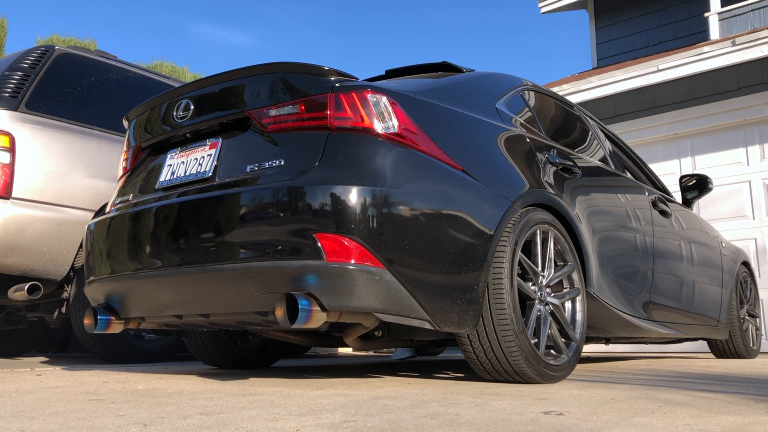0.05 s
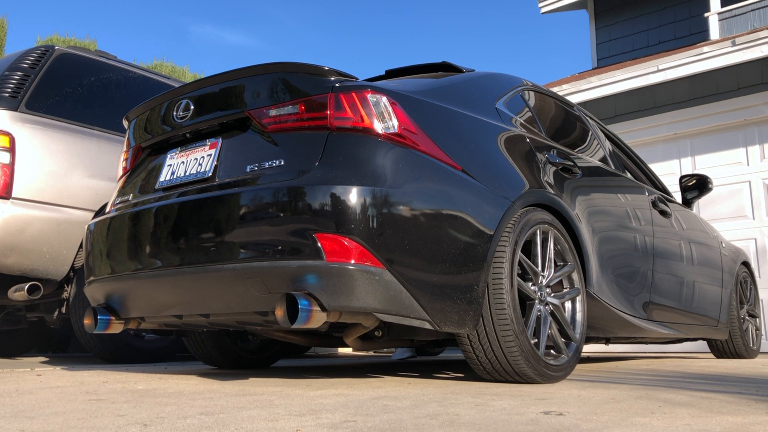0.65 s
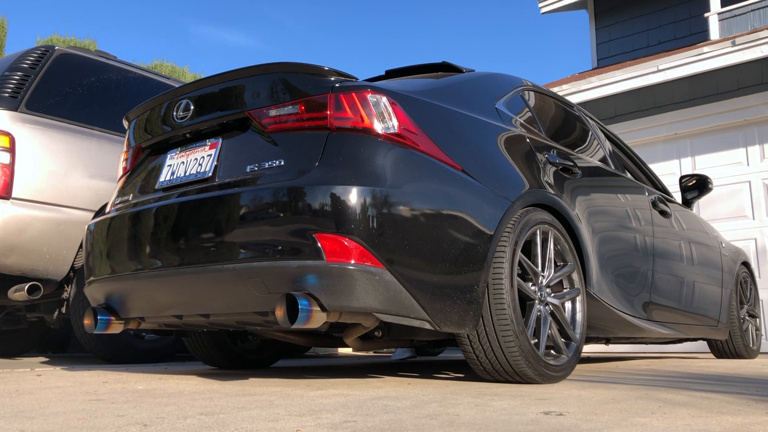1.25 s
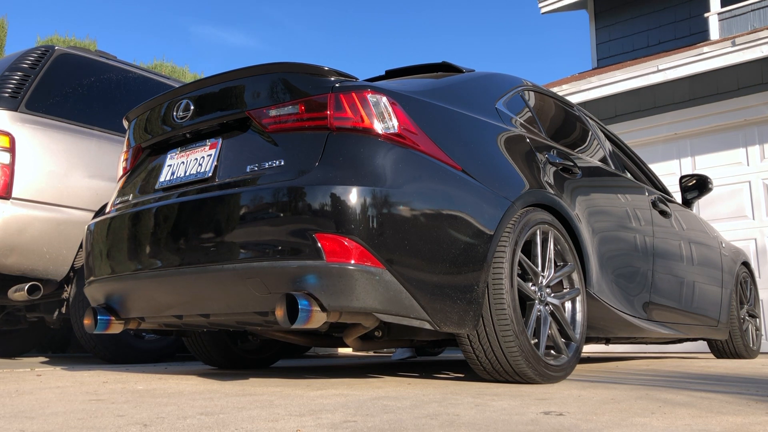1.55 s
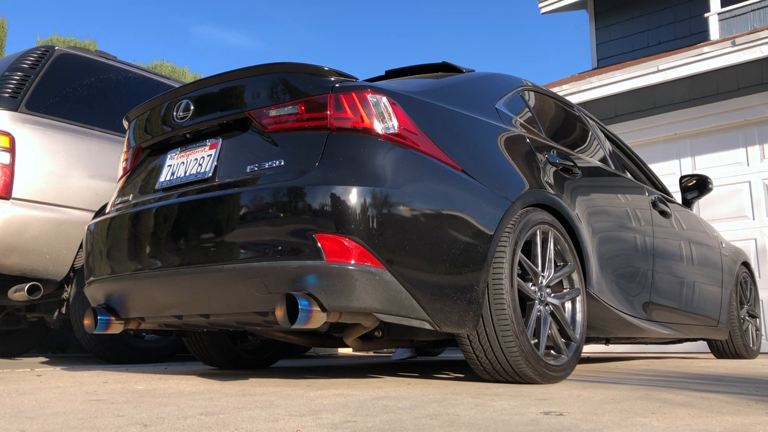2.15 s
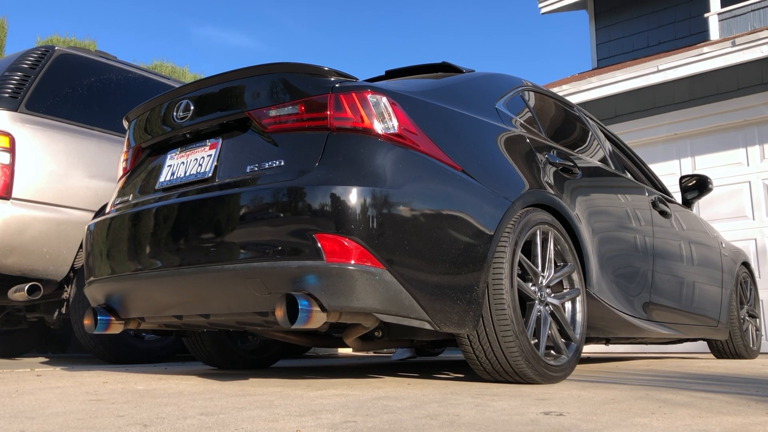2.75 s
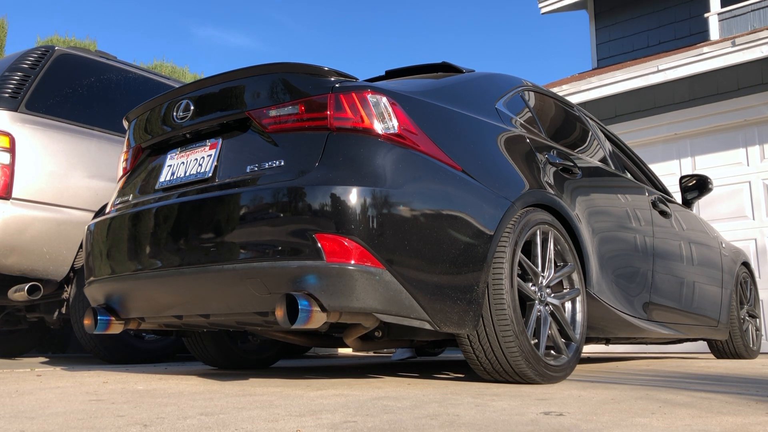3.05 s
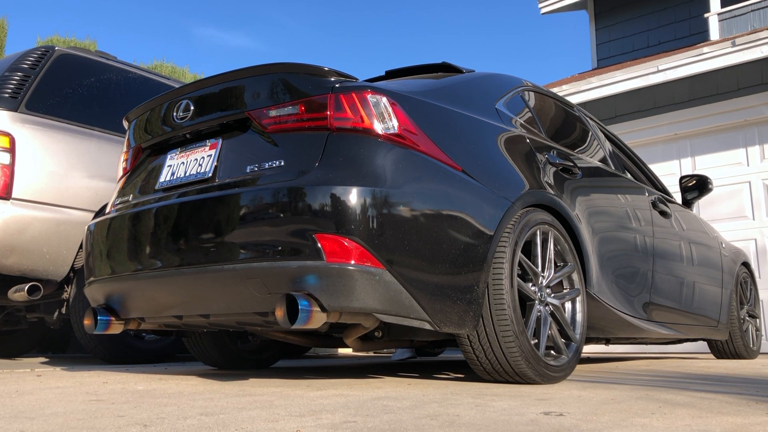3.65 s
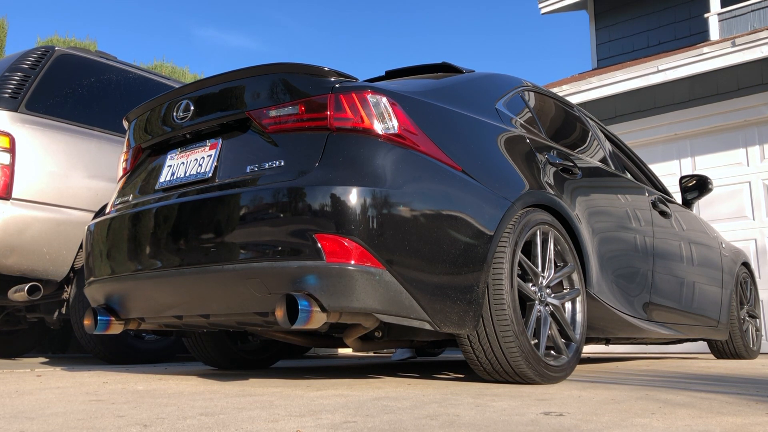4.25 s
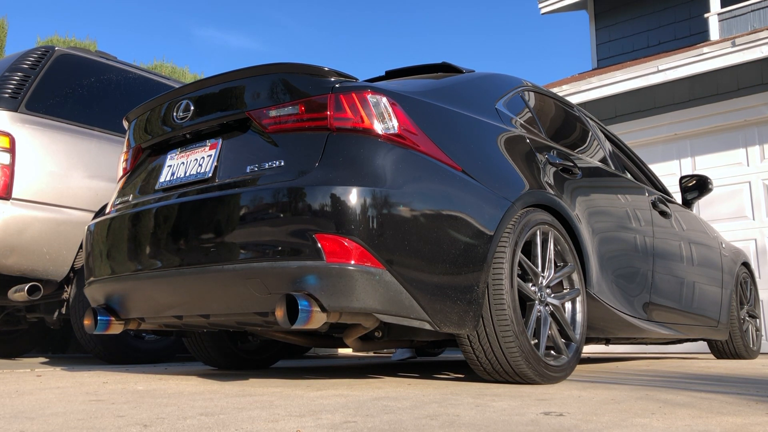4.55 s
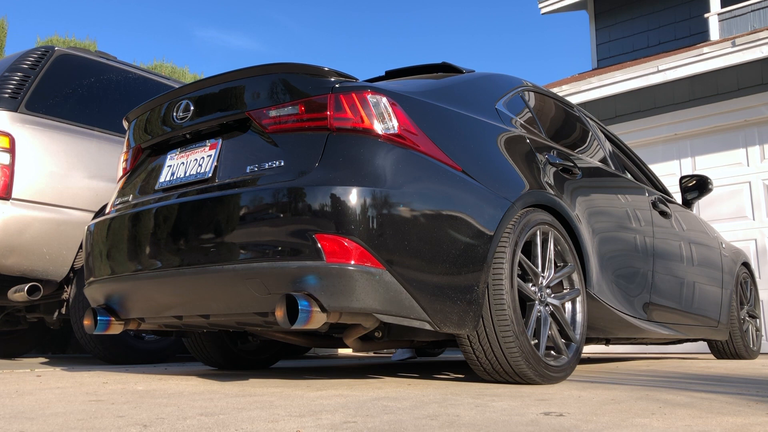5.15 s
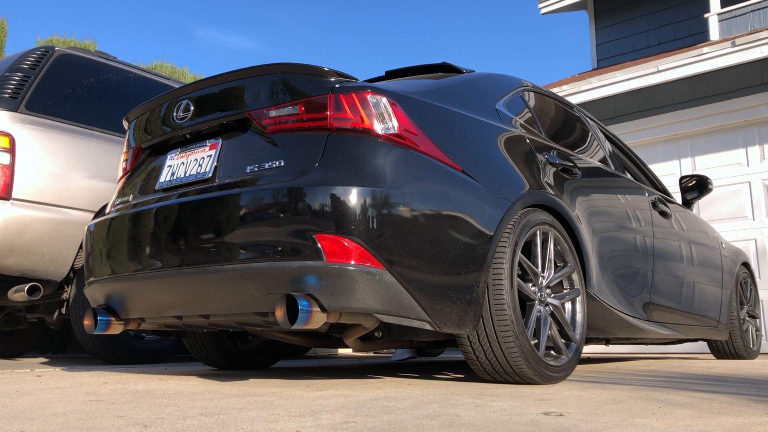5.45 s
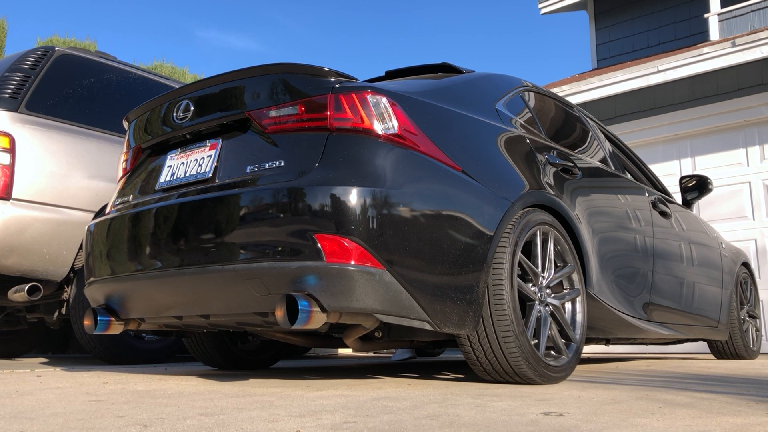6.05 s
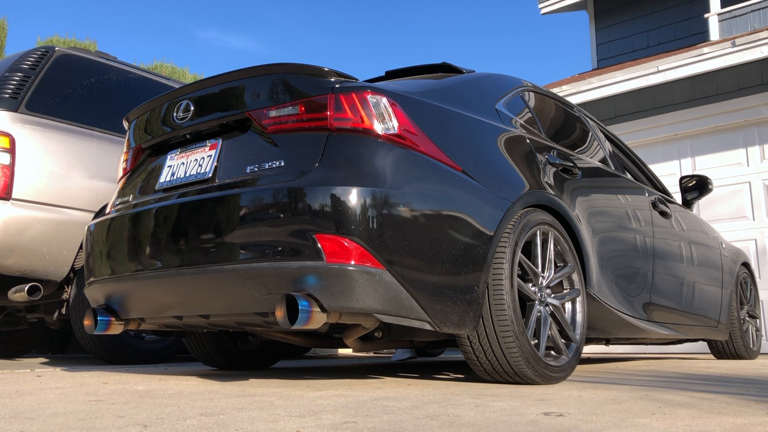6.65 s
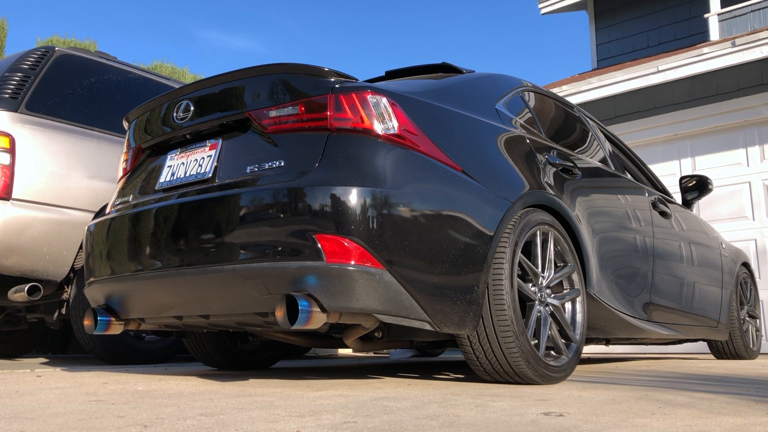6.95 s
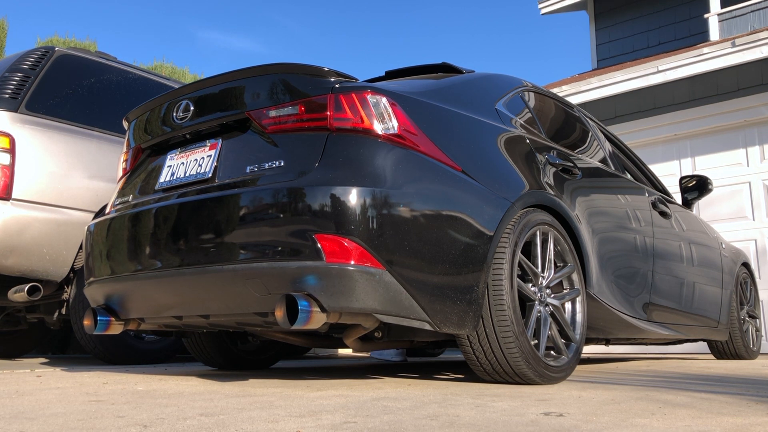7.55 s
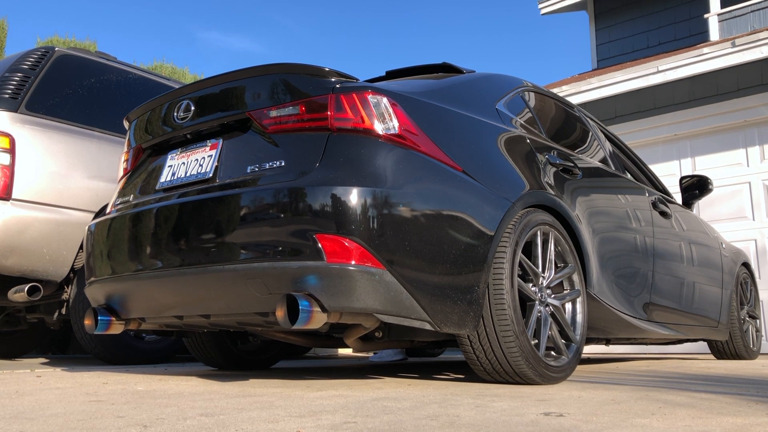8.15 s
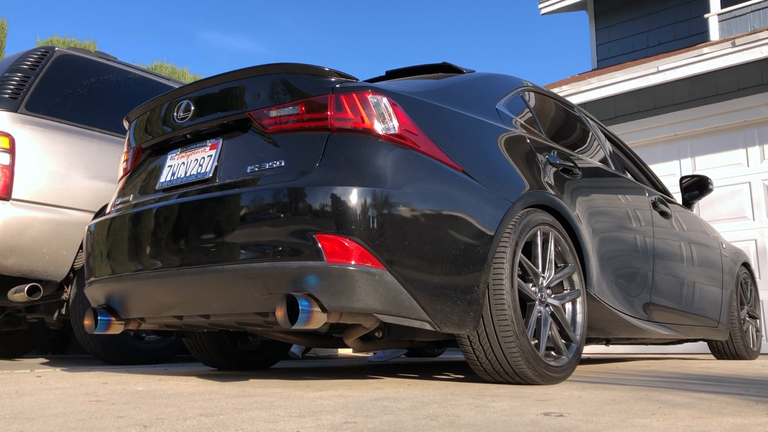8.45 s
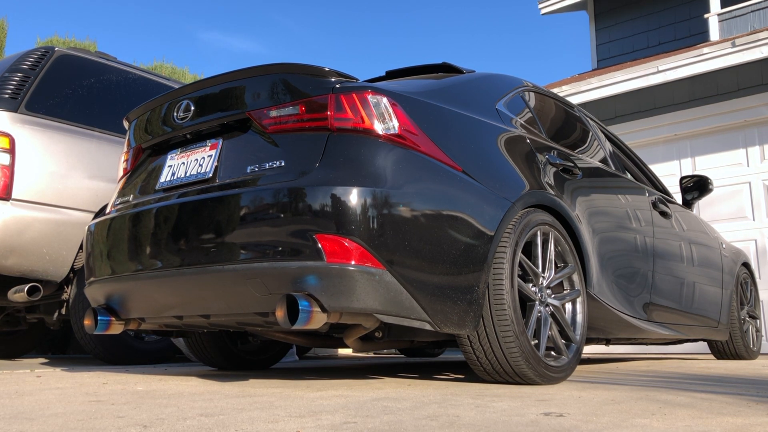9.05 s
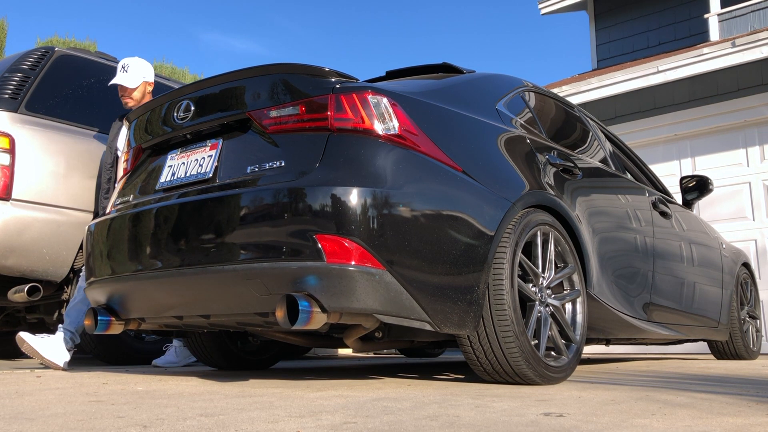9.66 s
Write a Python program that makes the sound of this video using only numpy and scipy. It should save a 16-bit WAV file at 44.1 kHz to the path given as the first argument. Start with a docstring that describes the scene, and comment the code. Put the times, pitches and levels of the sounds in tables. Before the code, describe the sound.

A six-cylinder car engine idles throughout in a driveway, heard from low and close behind its free-flowing exhaust. For the first second and a half it runs at a fast idle with a hard, uneven, cold rasp. Around 2 seconds the rasp gives way to a softer, slightly buzzy beat. Between about 4 and 7 seconds the revs sink a little and the buzz fades, leaving a deep, even drone that holds to the end. A faint, wavering timing chain whine and a light hiss from the engine bay and tailpipes sit above it, with a low rumble underneath. From about 8.5 seconds a soft rush rises. One tiny, sharp, bright click comes at 9.3 seconds, and at about 9.6 a shoe scuffs briefly on gritty concrete as the low rumble swells under the continuing idle.

```python
"""A V6 idles through a free-flowing exhaust in a driveway, heard from low behind the car.
Uneven cylinder pulses ring the pipes with a hard, cold rasp; around two seconds in, the cams swing back
and the beat softens, then the revs sink to a deep, even drone. The timing chain whines faintly over the
hiss of engine bay and tailpipes, with a low rumble underneath. Near the end a soft rush rises, there is
one sharp click, and a shoe scuffs the concrete as the rumble swells."""
import sys
import numpy as np
from scipy import signal
from scipy.fft import rfft, irfft, next_fast_len
from scipy.io import wavfile
from scipy.ndimage import uniform_filter1d

SR = 44100
rng = np.random.default_rng(int(sys.argv[2]) if len(sys.argv) > 2 else 0)


def generate_wav(sig):
    """Save sig (samples, or channels by samples) to the path in sys.argv[1] as 16-bit PCM at SR."""
    pcm = np.round(np.clip(np.atleast_2d(sig).T, -1, 1) * 32767).astype(np.int16)
    wavfile.write(sys.argv[1], SR, pcm)


N = 432621
TIME = np.arange(N) / SR
IDLE_HZ, FAST_IDLE_HZ = 64, 71  # firing rates

# The revs. Each row: time in seconds, firings per second.
REVS = [(0.0, 71.14), (0.7, 71.98), (1.0, 71.47), (1.4, 71.66), (1.65, 70.7), (1.85, 71.14), (2.5, 69.58),
        (2.9, 69.91), (3.3, 71.14), (4.1, 69.82), (4.5, 69.5), (5.3, 68.15), (6.5, 64.5), (6.9, 63.85),
        (7.7, 64.11), (8.5, 63.5), (8.9, 63.99), (9.81, 63.58)]

def engine_state():
    """The firing rate in Hz, then three 0-1 faders: hard cam timing, cold load and shut throttle."""
    speed = np.interp(TIME, *np.transpose(REVS))
    hard = 1 - ramp(1.525, 1.736)  # the cams swing back, ending the rasp
    load = 1 - ramp(1.73, 2.27)
    shut = ramp(1.27, 2.1) - ramp(2.35, 3.14)
    return speed, hard, load, shut


# The drone under cold load. Each row: multiple of the firing rate, level in dB.
COLD_DRONE = [(1, -28), (2, -19.9), (3, -22), (4, -30.3), (5, -24.5), (6, -22.5)]
# Standing waves of the warm pipes. Each row: centre in Hz, width in Hz, peak level in dB.
STANDING_WAVES = [(62.3, 4.3, -33.5), (69.7, 3, -41.5), (131.3, 34.7, -18.5), (194.1, 16, -27),
                  (214.9, 13.2, -22.5), (248.8, 42.4, -34), (290, 16, -31.5), (322.5, 31.8, -31),
                  (340.3, 18, -29.5), (403, 31.9, -40.5), (425.2, 11.3, -30)]

def exhaust_drone(firing, waver_db=0.15, waver_hz=25, sag_db=-3, shut_db=-2):
    """The body: six firing harmonics, all strong when cold; once warm, each swells on a standing wave."""
    speed, _, load, shut = engine_state()
    centre, width, peak_db = np.transpose(STANDING_WAVES)[:, :, None]
    hz = np.arange(50, 450, .25)
    pipes_db = 10 * np.log10(np.sum((gain_of(peak_db) * resonance(hz, centre, width)) ** 2, 0))
    early = 1 - ramp(1.55, 1.76)
    sag = np.sin(np.pi * early)  # a brief dip as the cams swing back
    out = np.zeros(N)
    for k, (_, cold_db) in enumerate(COLD_DRONE, 1):
        upper = k > 2
        warm_db = np.interp(k * speed, hz, pipes_db) + shut_db * shut * upper
        db = load * cold_db + (1 - load) * warm_db + sag_db * sag * upper
        lead = early * upper * (k + 6) / 11 - (k != 2) / 3  # in cycles; warm, the second harmonic leads
        out += gain_of(db + waver_db * wander(TIME * waver_hz)) * np.cos(2 * np.pi * (k * firing + lead))
    return np.sqrt(2) * out


# The tone of each gas puff. Each row: frequency in Hz, relative level in dB.
PUFF_EQ = [(100, -10), (300, -7), (550, -2), (1200, 3), (2000, 5), (5000, 5)]

def blowdowns(firing, cylinder_db, lag, modes, pulse_db, puff_db, puff_firings, leak, uneven_db):
    """Six unequal cylinders vent in turn, each a pressure pulse and a turbulent puff that ring the pipes."""
    size, cylinders = 4096, 6
    order = np.arange(size // 16)
    cycle = np.arange(size) * cylinders / size  # one engine cycle, in firings
    strength = unit_rms(gain_of(cylinder_db))
    opens = np.arange(cylinders) + lag
    harmonics = strength @ np.exp(-2j * np.pi * np.outer(opens, order) / cylinders)
    harmonics[(order % cylinders == 0) & (order <= cylinders ** 2)] = 0  # leave room for the drone
    pulses = unit_rms(np.interp(firing, cycle, irfft(harmonics, size), period=cylinders))
    # stronger cylinders blow much more turbulence
    flow = strength ** 2 @ np.exp(-((cycle - opens[:, None]) % cylinders) / puff_firings)
    puffs = unit_rms((leak + np.interp(firing, cycle, flow, period=cylinders)) * noise(PUFF_EQ))
    blows = (gain_of(pulse_db) * pulses + gain_of(puff_db) * puffs) * gain_of(uneven_db * wander(firing))
    centre, width, mode_db = modes
    hz = abs(np.fft.fftfreq(size, 1 / SR))
    pipe_power = gain_of(mode_db) ** 2 @ resonance(hz, centre[:, None], width[:, None]) ** 2
    return signal.oaconvolve(blows, minimum_phase(np.sqrt(pipe_power)))[:N]


# The cylinders in firing order. Each row: cold relative level in dB, cold valve lag in firings,
# warm relative level in dB, warm valve lag in firings.
CYLINDERS = [(.5, .72, -2.2, .2), (-2, .76, .4, .12), (2, .72, .4, .21), (-1.7, .71, -3.2, .21),
             (2.4, .73, 1.8, .23), (-3.4, .74, -.7, .22)]
# The ring of pipes and silencers. Each row: centre in Hz, width in Hz, cold gain in dB, warm gain in dB.
PIPE_MODES = [(126.7, 38.5, -34, -34), (152, 23, -58, -38), (222.8, 14.5, -30.5, -33.5),
              (333, 35.4, -34, -40.5), (422.4, 123, -35.5, -46), (492.9, 47.3, -50.5, -44),
              (639.3, 10, -54.5, -50), (727, 86, -43, -63.5), (801, 93, -42.5, -58), (947, 100, -51.5, -73),
              (1173, 130, -52, -74.5), (1265, 98, -50, -69.5), (1480, 76, -63.5, -72),
              (1588, 120, -57, -78.5), (1967, 340, -71, -85.5)]

def exhaust_beat(firing, idle_db=-1.5, hard_db=-1.25, load_db=3.5, db_per_hz=0.18, pull_db=0.43):
    """The cold rasp crossfades to a soft warm beat as the cams swing; it hits harder as the engine pulls."""
    speed, hard, load, _ = engine_state()
    cold_db, cold_lag, warm_db, warm_lag = np.transpose(CYLINDERS)
    centre, width, cold_ring_db, warm_ring_db = np.transpose(PIPE_MODES)
    valves = firing + .24  # the valves run slightly ahead
    cold = blowdowns(valves, cold_db, cold_lag, (centre, width, cold_ring_db),
                     pulse_db=23.5, puff_db=33, puff_firings=0.28, leak=0.063, uneven_db=1.4)
    warm = blowdowns(valves, warm_db, warm_lag, (centre, width, warm_ring_db),
                     pulse_db=25, puff_db=35, puff_firings=0.22, leak=0.37, uneven_db=0.1)
    pull = uniform_filter1d(np.gradient(speed) * SR, round(0.91 * SR))  # smoothed, in Hz per second
    cold_share = np.interp(hard, [0, 1], [.07, .87])
    db = idle_db + hard_db * hard + load_db * load + db_per_hz * (speed - IDLE_HZ) + pull_db * pull
    return gain_of(db) * (cold_share * cold + (1 - cold_share) * warm)


# The buzz on top of the beat. Each row: multiple of the firing rate, level in dB at a soft fast idle.
BUZZ_PARTIALS = [(7, -35), (9, -50.5), (10.5, -47), (11, -50), (12, -52), (14, -60.5), (18, -60)]

def pipe_buzz(firing, db_per_hz=1.85, hard_db=-9, shimmer_db=1.0, shimmer_hz=12):
    """At light load the firings are alike, so clean overtones stand out; they fade as the revs sink."""
    speed, hard, _, _ = engine_state()
    partials = sum(gain_of(db + shimmer_db * wander(TIME * shimmer_hz)) * np.cos(2 * np.pi * k * firing)
                   for k, db in BUZZ_PARTIALS)
    return np.sqrt(2) * gain_of(db_per_hz * (speed - FAST_IDLE_HZ) + hard_db * hard) * partials


# The tone of the engine bay. Each row: frequency in Hz, relative level in dB.
BAY_EQ = [(30, -8.5), (90, 6), (300, 27.5), (950, 3.5), (1500, 7.5), (2100, -3), (2800, -2.5), (4000, -5),
          (5200, -7), (7000, -15), (10000, -25.5), (16000, -36.5)]

def bay_hiss(firing, idle_db=-55, db_per_hz=0.2834, load_db=-2.5, shut_db=-5.5, flutter_db=0.54):
    """Belts and intake hiss under the car, riding the air flow and fluttering with the firings."""
    speed, _, load, shut = engine_state()
    db = idle_db + db_per_hz * (speed - IDLE_HZ) + load_db * load + shut_db * shut
    return gain_of(db + flutter_db * wander(2 * firing)) * underbody(noise(BAY_EQ, (2500, 7000)))


def underbody(x, echo_db=-17, shortest_s=.0011, longest_s=.014, count=10):
    """Short echoes between floor pan and concrete comb the sound."""
    delays = rng.uniform(shortest_s, longest_s, count)
    echoes = sum((-1) ** k * np.roll(x, round(s * SR)) for k, s in enumerate(delays))
    echo_gain = gain_of(echo_db)
    return (x + echo_gain * echoes) / np.sqrt(1 + count * echo_gain ** 2)


# The airy top of the escaping gas. Each row: frequency in Hz, relative level in dB.
GAS_EQ = [(2000, -25.5), (5000, -4.5), (8000, 1), (11000, 1.5), (13500, 2.5), (15600, 4)]

def tailpipe_hiss(firing, idle_db=-68, db_per_hz=0.38, load_db=2, shut_db=-3, flutter_db=0.7):
    """Gas leaves the tips in a bright, fluttering hiss that follows the flow."""
    speed, _, load, shut = engine_state()
    db = idle_db + db_per_hz * (speed - IDLE_HZ) + load_db * load + shut_db * shut
    return gain_of(db + flutter_db * wander(2 * firing)) * noise(GAS_EQ, (9000, 15000))


# The chain's whine. Each row: multiple of the tooth rate, base level in dB.
CHAIN_PARTIALS = [(5, -70.5), (6, -72), (7, -73.5), (8, -72), (9, -70.5), (10, -76.5), (12, -75),
                  (13, -77.5), (14, -78)]
# The ring of the chain cover. Each row: centre in Hz, width in Hz, boost in dB.
COVER_MODES = [(2400, 60, 10), (2905, 35, 5), (2988, 40, 11), (3070, 50, 5), (3345, 70, 5), (3434, 50, 11),
               (3812, 80, 9), (4272, 40, 5), (5060, 130, 6), (5378, 30, 7)]

def timing_chain(firing, teeth_per_firing=6, load_db=-9.5, shut_db=-3,
                 flicker_db=2.0, flicker_hz=16, slack_rad=0.38, slack_hz=25):
    """Links meet the sprocket: thin, wavering tones that swell as they cross the cover's resonances."""
    speed, _, load, shut = engine_state()
    hz = np.arange(1500, 6500, 4)
    cover_db = sum(boost_db * resonance(hz, centre, width) for centre, width, boost_db in COVER_MODES)
    out = np.zeros(N)
    for multiple, db in CHAIN_PARTIALS:
        k = multiple * teeth_per_firing
        ring_db = np.interp(k * speed, hz, cover_db)
        phase = 2 * np.pi * k * firing + slack_rad * wander(TIME * slack_hz)
        out += gain_of(db + ring_db + flicker_db * wander(TIME * flicker_hz)) * np.sin(phase)
    return np.sqrt(2) * gain_of(load_db * load + shut_db * shut) * out


# The click's cue. Each row: start in seconds, level in dB before the trim.
CLICK_CUES = [(9.2622, -14)]
# Its glassy tone. Each row: frequency in Hz, relative level in dB.
CLICK_EQ = [(1000, -23), (4000, -15), (6000, 1), (8500, -15), (11000, -4), (13500, -6), (15300, 3),
            (16800, -12)]

def click(decay_s=0.00086, trim_db=-19):
    """A tiny, dry, very bright snap of noise."""
    burst = sum(gain_of(db) * (TIME >= s) * np.exp(-abs(TIME - s) / decay_s) for s, db in CLICK_CUES)
    return gain_of(trim_db) * burst * noise(CLICK_EQ)


# The strokes of the scuff. Each row: peak time in seconds, level in dB, half-width in seconds.
SCUFF_CUES = [(9.542, -50, 0.018), (9.578, -43, 0.0069), (9.613, -51, 0.021)]
# The tone of sole on concrete. Each row: frequency in Hz, relative level in dB.
SCUFF_EQ = [(500, 0), (1500, 8), (3000, 1), (5000, -4), (8000, -13.5), (12000, -19), (16000, -24)]

def shoe_scuff(grit_db=3, grit_hz=400):
    """A sole drags briefly over gritty concrete."""
    pressure = sum(gain_of(db) * np.exp(-.5 * ((TIME - s) / width) ** 2) for s, db, width in SCUFF_CUES)
    return pressure * gain_of(grit_db * wander(TIME * grit_hz)) * noise(SCUFF_EQ)


# The tones of the rush and of the rumble. Each row: frequency in Hz, relative level in dB.
RUSH_EQ = [(200, -2.5), (600, 6), (1100, 4), (1700, -1), (2500, -16), (5000, -25), (12000, -41.5)]
RUMBLE_EQ = [(15, -22.5), (35, -9.5), (52, -3.5), (80, -8.5), (200, -33), (600, -66)]

def rush_and_rumble(rush_db=-69, rush_rise_db=25.5, rumble_db=-58.5, load_db=7.5, rumble_rise_db=22.5):
    """The bed: a low rumble eases with the cold load; late on, a soft rush rises, then the rumble swells."""
    _, _, load, _ = engine_state()
    rush = gain_of(rush_db + rush_rise_db * ramp(8.45, 9.1)) * noise(RUSH_EQ)
    rumble = gain_of(rumble_db + load_db * load + rumble_rise_db * ramp(9.42, 9.56)) * noise(RUMBLE_EQ)
    return rush + rumble


def gain_of(db):
    """Decibels to amplitude."""
    return 10 ** (np.asarray(db) / 20)


def unit_rms(x):
    """Scales to rms 1."""
    return x / np.sqrt(np.mean(x ** 2) + 1e-20)


def ramp(start_s, end_s):
    """A straight fade from 0 to 1."""
    return np.interp(TIME, [start_s, end_s], [0, 1])


def wander(position):
    """A random drift of rms 1 that glides to a new value at each whole step of position."""
    return unit_rms(np.interp(position, np.arange(4096), rng.standard_normal(4096)))


def resonance(hz, centre, width):
    """A bell curve of height 1 and the given width at half height."""
    return 1 / (1 + (2 * (hz - centre) / width) ** 2)


def minimum_phase(gains):
    """The quickest-starting ring with this two-sided spectrum."""
    log_gain = np.log(np.maximum(gains, 1e-6))
    return np.fft.ifft(np.exp(np.conj(signal.hilbert(log_gain)))).real


def noise(eq, band_hz=(0, SR)):
    """Noise shaped by an EQ curve, of rms 1 within the band."""
    size = next_fast_len(N)
    hz = np.fft.rfftfreq(size, 1 / SR)
    eq_hz, eq_db = np.transpose(eq)
    spectrum = rfft(rng.standard_normal(size)) * gain_of(np.interp(np.log(hz + 1), np.log(eq_hz), eq_db))
    power = abs(spectrum) ** 2
    band_share = power[(hz >= band_hz[0]) & (hz < band_hz[1])].sum() / power.sum()
    return unit_rms(irfft(spectrum, size)[:N]) / np.sqrt(band_share)


def scene():
    """The mono mix: one crankshaft drives every engine layer; the bed, click and scuff run free."""
    speed, *_ = engine_state()
    firing = np.cumsum(speed) / SR + .084  # running count of firings
    exhaust = exhaust_drone(firing) + exhaust_beat(firing) + pipe_buzz(firing)
    engine = exhaust + bay_hiss(firing) + tailpipe_hiss(firing) + timing_chain(firing)
    return (engine + rush_and_rumble() + click() + shoe_scuff())[None]


def record(dry, fade_s=.004, cutoff_hz=15900):
    """A very short fade at each end, then a steep high cut."""
    fade = np.minimum(np.minimum(TIME, TIME[::-1]) / fade_s, 1)
    high_cut = signal.firwin(511, cutoff_hz, window=("kaiser", 9), fs=SR)
    return signal.oaconvolve(dry * fade, high_cut[None], "same")


dry = scene()
out = record(dry)
generate_wav(out)
```